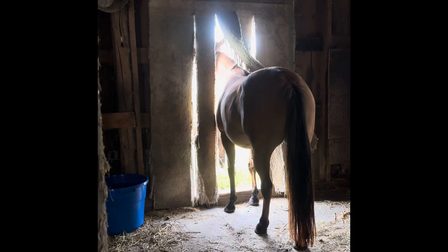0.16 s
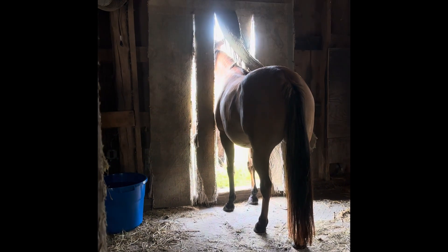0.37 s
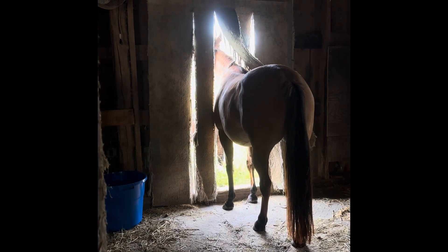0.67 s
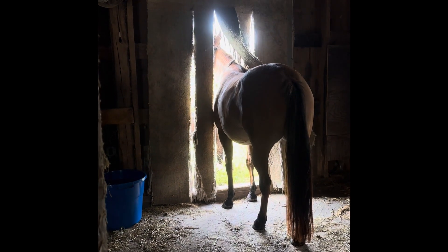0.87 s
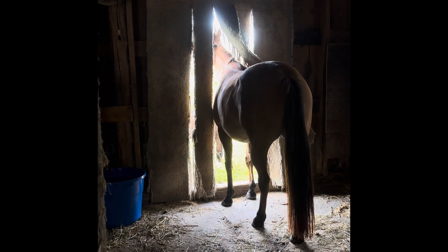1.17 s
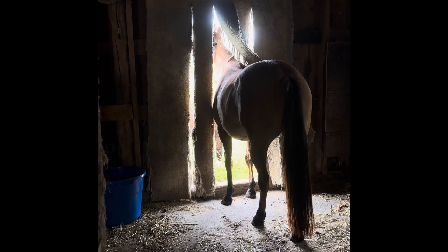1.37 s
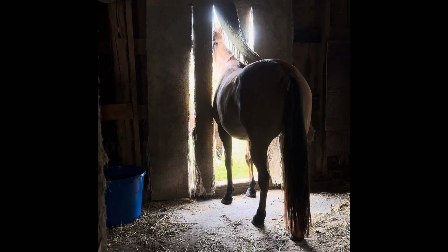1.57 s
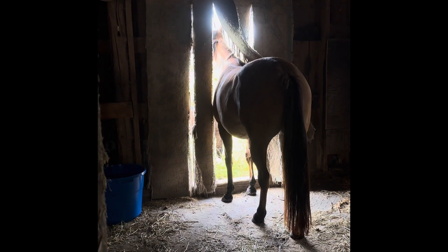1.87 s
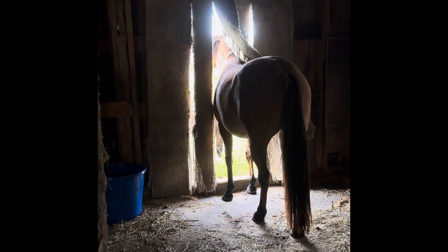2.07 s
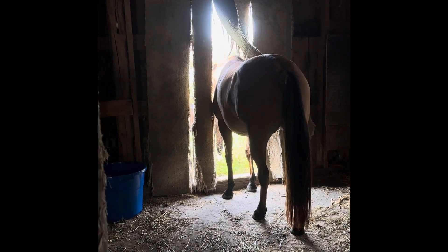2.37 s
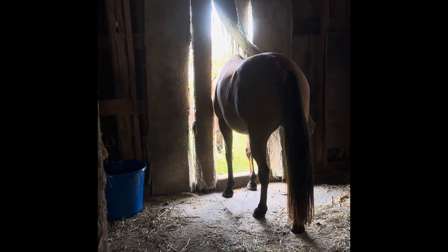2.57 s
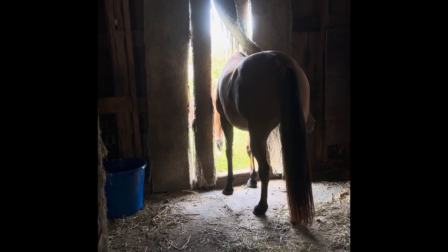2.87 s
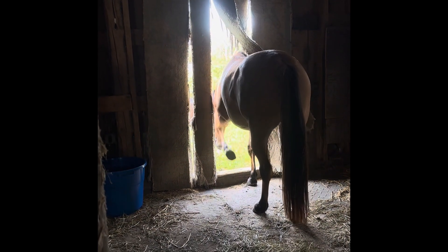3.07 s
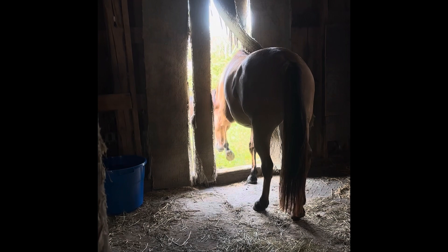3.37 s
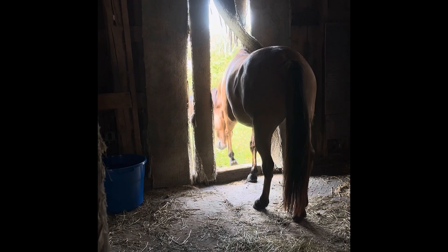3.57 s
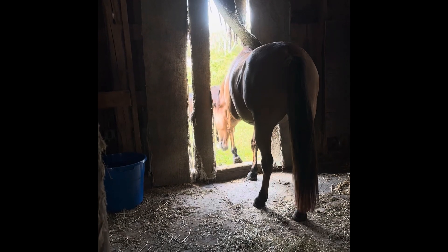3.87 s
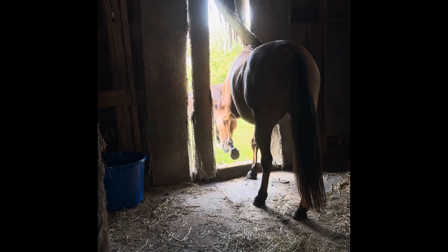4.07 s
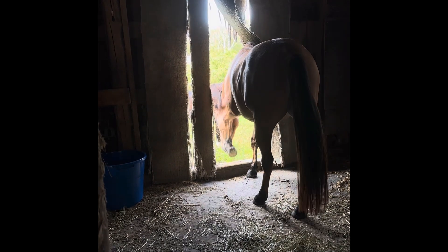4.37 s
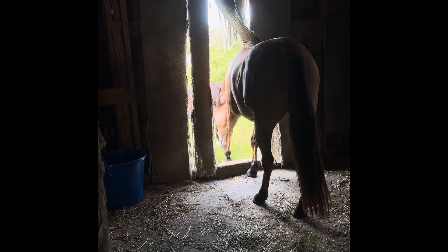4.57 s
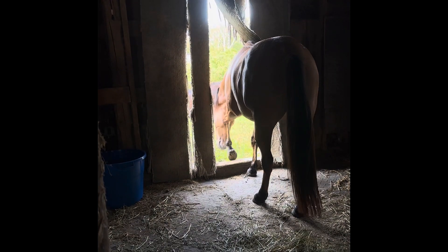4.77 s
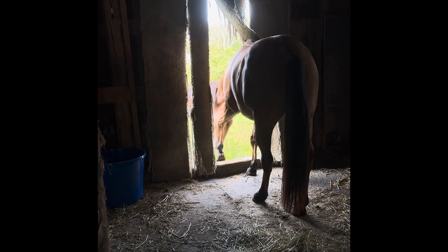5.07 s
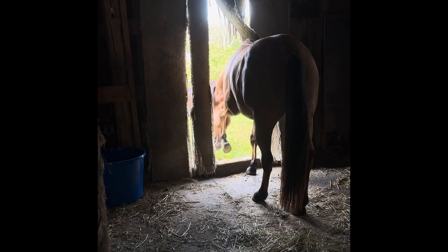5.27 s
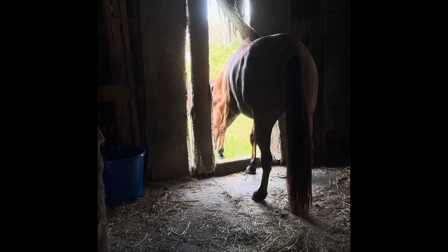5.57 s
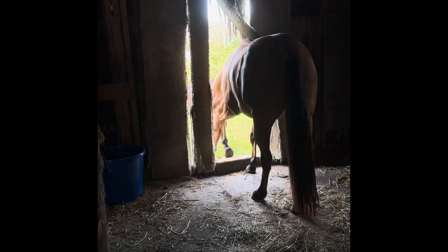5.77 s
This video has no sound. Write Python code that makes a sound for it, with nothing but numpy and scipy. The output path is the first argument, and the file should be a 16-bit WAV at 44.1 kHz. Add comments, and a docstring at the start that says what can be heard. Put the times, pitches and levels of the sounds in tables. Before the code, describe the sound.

Inside a quiet barn, soft wind rumble and a low distant hum continue throughout, with a very faint insect buzz. Early on a hand rubs the microphone and its case creaks in quick clicks. Straw ticks lightly. In the second half a horse paws at the wooden doorway: scrapes of grit and deep, hollow thuds with a short boomy echo, heard in stereo from a handheld microphone a few steps behind.

```python
"""Hooves at a barn door

A horse paws at the wooden sill: hooves set the modes of the boards ringing and drag through grit and straw.
Hooves and boards are decaying sines; grit, straw and wind are shaped noise, and the boards echo in the barn.
Filtered noise gives a low hum, and pulsed noise a buzzing insect. A hand rubs the two-port microphone and
its case creaks. The bass is mono below a moving edge, and the centre hollows briefly under the grip.
"""
import sys
import numpy as np
from scipy import signal
from scipy.fft import rfft, irfft
from scipy.io import wavfile
from scipy.ndimage import uniform_filter1d

SR = 44100
rng = np.random.default_rng(int(sys.argv[2]) if len(sys.argv) > 2 else 0)


def output_pcm(signal):
    """Save a mono or channel-first signal as 16-bit PCM at the path in sys.argv[1].

    Samples are clipped to [-1, 1] before scaling.
    """
    pcm = np.clip(np.atleast_2d(signal).T, -1, 1) * 32767
    wavfile.write(sys.argv[1], SR, np.round(pcm).astype(np.int16))


N = 261072  # samples


def gain_of(db):
    """Level law: decibels to amplitude ratio."""
    return 10 ** (np.asarray(db) / 20)


def evened(x):
    """Power normalisation: scales to rms 1."""
    return x / np.sqrt(np.mean(abs(x) ** 2) + 1e-20)


def read(points, hz):
    """Logarithmic frequency scale: interpolates a spectrum along it."""
    f, value = np.transpose(points)
    return np.interp(np.log(hz + 1), np.log(f + 1), value)


def track(rows, count=N):
    """Linear interpolation in time: each column of a curve at count even steps."""
    s, *columns = np.transpose(rows)
    times = np.linspace(0, N / SR, count)
    return [np.interp(times, s, column) for column in columns]


def add(mix, s, sound):
    """Superposition: adds a sound to the mix, in place, from s seconds."""
    part = mix[round(s * SR):][:len(sound)]
    part += sound[:len(part)]


def colour(x, points):
    """Linear filtering: multiplies the spectrum by a gain curve without phase shift."""
    return irfft(rfft(x) * gain_of(read(points, np.fft.rfftfreq(N, 1 / SR))), N)


def lumps(size):
    """Low-pass random process: twice-averaged noise, rms 1, changing over size samples."""
    return evened(uniform_filter1d(uniform_filter1d(rng.standard_normal(N), size), size))


def patchy(patchy_db, wide, long):
    """Non-stationary noise: two channels share random patches, wide in bins and long in frames."""
    shape = (257, N // 128 + 5)  # bins of a 512-sample spectrum, frames of 128 samples
    patches = uniform_filter1d(rng.standard_normal(shape), wide, 0)
    patches = evened(uniform_filter1d(patches, long, 1))
    z = rng.standard_normal((2, *shape)) + 1j * rng.standard_normal((2, *shape))
    return signal.istft(z * gain_of(patchy_db * patches), nperseg=512, noverlap=384)[1][:, :N]


def stroke(touch, full, lift, rise_db, fall_db_per_s):
    """Friction envelope: climbs by rise_db from touch to full, and falls steadily from lift."""
    t = np.arange(N) / SR
    climb = np.clip((full - t) / max(full - touch, .001), 0, None)
    fall_db = fall_db_per_s * np.maximum(t - lift, 0)
    return (t > touch - .01) * gain_of(-rise_db * climb - fall_db)


def palm():
    """Acoustic shadow: gain of the distant wash and the insect while the palm covers the ports."""
    shade_db = -5
    cover = stroke(1.1, 1.24, 1.56, rise_db=14, fall_db_per_s=403)
    return 1 - (1 - gain_of(shade_db)) * cover


# wind strength: [t/s, rumble level/dB, roar level/dB]
WIND = [(0, -48, -60), (.6, -49.5, -61), (1.35, -50.5, -60.5), (1.6, -42, -52), (2.5, -44.5, -55),
        (3.4, -45.5, -51), (3.8, -42, -54.5), (4.3, -39.5, -66.5), (5.1, -48, -64), (5.92, -54, -55.5)]
# spectral shape of the rumble: [f/Hz, level/dB]
RUMBLE = [(12, -72), (20, -26), (41, -2.5), (92, -0.5), (114, -5.5), (135, -14.5), (217, -12.5),
          (241, -27.5), (260, -12), (340, -39), (570, -120)]
# spectral shape of the roar: [f/Hz, level/dB]
ROAR = [(88, -41), (150, 8.5), (215, -10), (242, -9), (275, -1), (700, -14), (910, -44.5), (1540, -120)]
# spectral shape of the distant wash: [f/Hz, level/dB]
YARD = [(150, -32), (250, -4.5), (386, -15), (428, -8), (492, -12.5), (684, -13.5), (842, -9), (1440, -22),
        (2000, -33.5), (2380, -34.5), (4770, -45), (5980, -38.5), (6640, -46.5), (10000, -48), (12500, -61),
        (16000, -64.5)]


def wind():
    """Turbulence noise: lumpy rumble, a roar reaching higher, and a distant wash in drifting patches."""
    wash_db = -60
    rumble_db, roar_db = track(WIND)
    rumble = evened(colour(rng.standard_normal((2, N)), RUMBLE))
    rumble = rumble * gain_of(rumble_db + 0.25 * lumps(size=3000))
    roar = evened(colour(rng.standard_normal((2, N)), ROAR)) * gain_of(roar_db)
    wash = evened(colour(patchy(1.3, wide=6, long=20), YARD)) * gain_of(wash_db)
    return rumble + roar + wash * palm()


# tones of far machinery, before the swell: [f/Hz, half-width at half amplitude/Hz, level/dB]
HUM = [(106.4, 8.4, -53.5), (214.1, 6.4, -56.5), (233.5, 4.3, -58.5), (402.5, 3.9, -72.5),
       (1043, 6.8, -78.5)]
# slow swell: [t/s, lowest tone level/dB, upper tones level/dB]
HUM_SWELL = [(0, 5.5, 2), (1.2, -11.5, 0.5), (2.2, -2, 0), (2.6, 11, -5.5), (3.7, 5.5, -3.5), (4.4, -2, -1),
             (5.92, -4, 0)]


def hum():
    """Narrow-band noise: resonance curves select fuzzy low tones that swell slowly."""
    hz, noise = np.fft.rfftfreq(N, 1 / SR), rfft(rng.standard_normal(N))
    tones = []
    for f, width, db in HUM:
        resonance = 1 / (1 + ((hz - f) / width) ** 2)
        tones.append(gain_of(db) * evened(irfft(noise * resonance, N)))
    lowest_db, upper_db = track(HUM_SWELL)
    return tones[0] * gain_of(lowest_db) + sum(tones[1:]) * gain_of(upper_db)


def insect():
    """Amplitude modulation: one puff of noise per wing stroke excites one resonance."""
    strokes_per_s, resonance_hz, half_width_hz, level_db = 59.8, 5884, 160, -86.5
    turns = np.arange(N) * strokes_per_s / SR + 0.28
    puffs = rng.standard_normal(N) * np.exp(2.3 * np.cos(2 * np.pi * turns))
    puffs = puffs * gain_of(3.0 * lumps(size=2000))
    hz = np.fft.rfftfreq(N, 1 / SR)
    resonance = 1 / (1 + ((hz - resonance_hz) / half_width_hz) ** 4)
    return gain_of(level_db) * evened(irfft(rfft(puffs) * resonance, N))


# rubs, before the port gains: [touch t/s, full t/s, lift t/s, level/dB, treble level over it/dB]
RUBS = [(.45, 0.53, 0.47, -46, -8), (1.015, 1.09, 1.224, -48.5, 1), (1.21, 1.246, 1.42, -53.5, -14)]
# spectral shape of skin on the case: [f/Hz, level/dB]
SKIN = [(80, 0.5), (220, 6), (500, -4), (1300, -8), (2500, -29), (5000, -38.5), (7200, -37), (8300, -27),
        (9600, -42), (16000, -75)]
# creaks of the case, before the port gains: [t/s, level/dB]
CREAKS = [(1.223, -57), (1.278, -52), (1.316, -51), (1.332, -51), (1.407, -46.5), (1.436, -46),
          (1.454, -46), (1.485, -46), (1.517, -40.5), (1.582, -40), (2.68, -51)]
# modes of the case: [f/Hz, level/dB, t60/s]
CASE = [(800, 10, 0.02), (1500, 2, 0.017), (2120, -14.5, 0.0081), (3200, -23, 0.004), (4460, -16, 0.002),
        (5900, -12, 0.0041), (8140, -7.5, 0.019)]


def hand():
    """Stick-slip and modal ringing: skin rubs the case, which creaks in short clicks."""
    # gains at the left and right port; opposite signs are opposite phase
    rub_ports, treble_ports = np.array([[1.29], [-0.95]]), np.array([[0.65], [0.11]])
    creak_ports = np.array([[1.21], [-0.69]])
    skin = evened(colour(rng.standard_normal(N) * gain_of(3.6 * lumps(size=200)), SKIN))
    low = signal.sosfiltfilt(signal.butter(N=4, Wn=6500, fs=SR, output="sos"), skin)
    rub = np.zeros((2, N))
    for *times, db, treble_db in RUBS:
        envelope = gain_of(db) * stroke(*times, rise_db=17.5, fall_db_per_s=282)
        rub += envelope * (rub_ports * low + gain_of(treble_db) * treble_ports * (skin - low))
    t, creaks, lead = np.arange(1500) / SR, np.zeros(N), 100  # lead: room before the click, samples
    click = sum(gain_of(db - 60 * t / t60) * np.sin(2 * np.pi * hz * t) for hz, db, t60 in CASE)
    click = np.pad(click, (lead, N - len(t) - lead))
    click = colour(click, [(8600, -9.5), (9600, -29)])[:len(t) + lead]
    for s, db in CREAKS:
        add(creaks, s - lead / SR, gain_of(db) * click)
    return rub + creak_ports * creaks


# straw snapping and rustling: [t/s, rustle level/dB, first snap level over the rustle/dB]
STRAW = [(0.7432, -73, 6), (0.9014, -63.5, -8), (1.6106, -76.5, 7), (2.1096, -78.5, -2), (2.6312, -77, 6),
         (2.979, -58, 13), (3.353, -76, -2), (3.3768, -72.5, -12), (3.4996, -69.5, -10), (3.677, -70, -14),
         (3.8347, -74, 1), (3.895, -62.5, 8), (4.293, -71, -14), (5.028, -68.5, -5), (5.2725, -74.5, -10.5),
         (5.3627, -69, -14)]


def straw():
    """Impulsive fracture: each snap is a soft-edged noise burst over a longer rustle."""
    rustle_t60, snap_t60, rise_s = 0.11, .025, 0.0007
    band = signal.butter(N=2, Wn=[3800, 10900], btype="band", fs=SR)
    wide = signal.butter(N=2, Wn=[2000, 10900], btype="band", fs=SR)  # the snap reaches lower
    out, t = np.zeros((2, N)), np.arange(SR // 8) / SR
    for s, db, snap_db in STRAW:
        burst = rng.standard_normal((2, len(t)))
        rustle = gain_of(db - 60 * t / rustle_t60) * evened(signal.lfilter(*band, burst))
        snap = gain_of(db + snap_db - 60 * t / snap_t60) * evened(signal.lfilter(*wide, burst))
        for side, sound in zip(out, (1 - np.exp(-t / rise_s)) * (rustle + snap)):
            add(side, s - .001, sound)
    return out


# drags: [touch t/s, full t/s, lift t/s, grit level/dB, weight on the boards over the grit/dB,
#         treble level over the grit/dB]
DRAGS = [(2.959, 2.972, 3.02, -57, -10, -1.5), (3.475, 3.496, 3.7, -74.5, -5, -1.5),
         (3.884, 3.917, 4.05, -53.5, 21, -2.5), (4.616, 4.638, 4.66, -53, 19, 0.5),
         (4.672, 4.693, 4.79, -49, 13, -0.5), (5.113, 5.136, 5.147, -55.5, 21.5, -2.5),
         (5.515, 5.534, 5.58, -63.5, 24, -2.5), (5.61, 5.764, 5.826, -49.5, 17, 3)]
# spectral shape of the grit: [f/Hz, level/dB]
GRIT = [(300, -15), (500, -10.5), (800, -10.5), (1400, -13.5), (1700, -23), (2030, -20.5), (2130, -10.5),
        (2250, -21.5), (2550, -19), (3000, -24.5), (4000, -20.5), (4800, -24.5), (6200, -26), (9500, -26),
        (15000, -31), (16000, -42.5)]
# modes of the floor boards; high bending waves arrive first: [f/Hz, level/dB, t60/s, arrival t/s]
BOARDS = [(53.5, -15.4, .49, .0114), (62.6, -1.3, .72, .0202), (71.1, -10.8, .65, .0298),
          (80, -4, .28, .0109), (99.2, -5.9, .86, .0111), (109.6, -11.5, .79, .0099),
          (124.5, -12.4, 1.2, .0127), (134.6, 0, .35, .0098), (156.7, .5, .22, .0089),
          (168.7, -11.1, .41, .0193), (215, -14, .3, .01), (245, -17, .25, .009), (265, -15, .25, .009),
          (282, -16, .25, .008), (305, -15, .25, .008), (362, -19, .25, .008), (415, -27, .2, .007),
          (488, -30, .25, .005), (570, -32, .2, .003), (636, -33, .2, .002), (700, -33, .15, .001),
          (760, -33, .15, .001), (812, -32, .15, .001), (850, -33, .15, .001)]


def drags():
    """Friction excitation: clumped grains hiss under the hoof, and its slips shake the boards."""
    rise_db, fall_db_per_s = 18, 353
    settle_db, settle_db_per_s = -13.5, 129.5  # loose grit trickles on
    kick_db, kick_s, kick_db_per_s = -16, .018, 246  # grit thrown by each blow, over its toe crack
    kicked = np.zeros(N)
    for s, *_, crack_db in STEPS:
        throw = stroke(s, s + kick_s, s + kick_s, rise_db, kick_db_per_s)
        kicked += gain_of(crack_db + kick_db) * throw
    clumps_db = 2.34 * rng.exponential(1, (2, N)) + 1.6 * lumps(size=150)
    grains = evened(colour(patchy(3.3, wide=8, long=6) * gain_of(clumps_db), GRIT))
    # each drag is duller or brighter above 4500 Hz
    dull = signal.sosfiltfilt(signal.butter(N=2, Wn=4500, fs=SR, output="sos"), grains)
    level, treble, press = kicked, kicked, 0
    for *times, db, weight_db, treble_db in DRAGS:
        scrape = gain_of(db) * stroke(*times, rise_db, fall_db_per_s)
        settle = gain_of(db + settle_db) * stroke(*times, rise_db, settle_db_per_s)
        level = level + scrape + settle
        treble = treble + (scrape + settle) * gain_of(treble_db)
        press = press + scrape * gain_of(weight_db)
    t, ring = np.arange(SR // 4) / SR, 0
    for hz, db, t60, _ in BOARDS:
        tilt_db = -8.0 * abs(np.log2(hz / 290))  # per octave away from 290 Hz
        damped_t60 = .5 * min(t60, .3)
        ring = ring + gain_of(db + tilt_db - 60 * t / damped_t60) * np.sin(2 * np.pi * hz * t)
    press = np.maximum(press, np.roll(press, round(0.023 * SR)))  # the weight lingers after the grit stops
    slips = evened(rng.standard_normal(N) * (rng.random(N) < 500 / SR)) * press  # 500 per s on average
    shake = signal.oaconvolve(slips, ring / np.linalg.norm(ring))[:N]
    return level * dull + treble * (grains - dull), shake


# hoof blows: [t/s, level at 60 Hz/dB, at 170 Hz/dB, at 300 Hz/dB, at 800 Hz/dB, toe crack level/dB]
STEPS = [(3.903, -35.5, -24, -35, -38, -72), (4.055, -42.5, -38, -26, -42, -71.5),
         (4.549, -13.5, -12, -19, -13.5, -44), (5.087, -29.5, -26, -11, -10, -44.5),
         (5.145, -42.5, -37, -21.5, -41, -56.5), (5.4591, -14, -18, -13.5, -23.5, -47.5)]


def steps():
    """Modal synthesis: each hoof cracks on the wood; toe and heel set the boards ringing."""
    heel_s, heel_db = .0346, -8  # the heel follows the toe
    out, t = np.zeros(N), np.arange(SR) / SR
    short = t[:SR // 10]
    crack_shape = [(300, -32), (700, 15.5), (1500, 3.5), (2300, 0), (4000, -15.5), (9000, -34.5)]  # Hz, dB
    for s, *blow_db, crack_db in STEPS:
        blow = [*zip((60, 170, 300, 800), blow_db)]
        for hz, mode_db, t60, arrival in BOARDS:
            rise = 1 - np.exp(-t * hz / .6)  # time constant of 0.6 cycle
            decay = gain_of(mode_db + read(blow, hz) - 60 * t / t60)
            ring = rise * decay * np.sin(2 * np.pi * hz * t)
            add(out, s + arrival, ring)
            add(out, s + arrival + heel_s, gain_of(heel_db) * ring)
        grains = np.pad(rng.standard_normal(len(short)), (0, N - len(short)))
        crack = evened(colour(grains, crack_shape)[:len(short)])
        envelope = (1 - np.exp(-short / 0.0016)) * gain_of(crack_db - 60 * short / 0.13)
        add(out, s, envelope * crack)
    return out


# reverberation time of the barn: [f/Hz, t60/s]
BARN = [(100, 1), (500, 0.12), (2000, 0.32), (8000, 0.046)]


def barn():
    """Reverberation: two sparse tails of random sign, each band dying at its own speed."""
    size = SR // 2
    taps = rng.choice([-1., 1.], (2, size)) * (rng.random((2, size)) < .05)
    taps = taps * (np.arange(size) > 200)  # no early echo
    hz, t, z = signal.stft(taps, SR, nperseg=512)
    decay = gain_of(-60 * t / read(BARN, hz)[:, None])
    tail = signal.istft(z * decay, SR, nperseg=512)[1]
    return tail / np.linalg.norm(tail[0])


# likeness of the two ports, limited to -1..1: [f/Hz, correlation]
SAME = [(150, .995), (300, 0.93), (640, 0.55), (1400, 0.71), (2400, 0.39), (3100, 0.14), (4900, -0.43),
        (5700, .6), (6150, .99), (7200, .99), (7700, .3), (11000, -0.57), (12000, -1.16), (14000, -0.82),
        (15000, -.5)]


def ports(one, other):
    """Spatial coherence: two ports from two unrelated copies of a diffuse sound."""
    same = np.clip(read(SAME, np.fft.rfftfreq(N, 1 / SR)), -1, 1)
    right = same * rfft(one) + np.sqrt(1 - same ** 2) * rfft(other)
    return np.array([one, irfft(right, N)])


# balance of the ports: [f/Hz, left minus right level/dB]
LEAN = [(250, 0.5), (400, 0), (700, -5), (1300, -4), (2400, 0), (4400, -1), (8000, -0.5)]


def leaned(pair):
    """Diffraction: the case shades one port in the mid range."""
    lean = gain_of(read(LEAN, np.fft.rfftfreq(N, 1 / SR)) / 2)
    return irfft(rfft(pair) * [lean, 1 / lean], N)


def scene():
    """Superposition: hooves with the barn's echo, the outdoors, and the hand."""
    grit, shake = drags()
    wood = steps() + shake
    echo_source = colour(wood, [(200, -13.0), (400, -5.5)])[None]
    echo = gain_of(-4.5) * signal.fftconvolve(echo_source, barn(), axes=1)[:, :N]
    diffuse = ports(*(echo + grit + straw() + wind()))
    return leaned(wood + diffuse) + hum() + insect() * palm() + hand()


def roll_off(x):
    """The treble ends steeply here."""
    return signal.sosfilt(signal.butter(12, 16450, fs=SR, output="sos"), x)


# edge below which the bass is mono: [t/s, f/Hz]
MONO_BELOW = [(0, 86), (1.47, 61), (1.55, 464), (2.7, 700), (3.5, 605), (4.0, 317), (4.85, 228), (5.0, 125),
              (5.5, 40.3), (5.92, 87.3)]
# under the grip the centre of the image cancels: [t/s, loss level/dB, lowest f/Hz, highest f/Hz]
HOLLOW = [(1.03, 1.5, 400, 1000), (1.1, 24.5, 333, 960), (1.42, 17, 338, 1260), (1.5, 20, 800, 1410),
          (1.55, 4, 1070, 1500)]


def record(dry):
    """Mid-side filtering: bass goes mono below a moving edge; the centre hollows under the grip."""
    low_cut_hz = 11
    sum_and_difference = [dry[0] + dry[1], dry[0] - dry[1]]
    hz, t, z = signal.stft(sum_and_difference, SR, nperseg=1024, noverlap=768)
    hz = hz[:, None] + 1  # keeps the ratios below finite
    edge_hz, = track(MONO_BELOW, count=len(t))
    loss_db, low_hz, high_hz = track(HOLLOW, count=len(t))
    z /= np.sqrt(1 + (low_cut_hz / hz) ** 6)
    z[1] /= 1 + (edge_hz / hz) ** 12
    z[0] *= gain_of(-loss_db / (1 + (low_hz / hz) ** 8) / (1 + (hz / high_hz) ** 8))
    mid, side = signal.istft(z, SR, nperseg=1024, noverlap=768)[1][:, :N] / 2
    mix = np.array([mid + side, mid - side])
    return roll_off(mix)


dry = scene()
out = record(dry)
output_pcm(out)
```